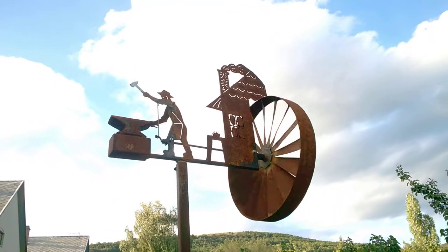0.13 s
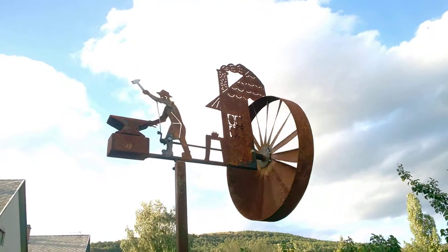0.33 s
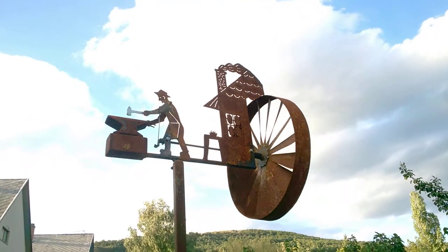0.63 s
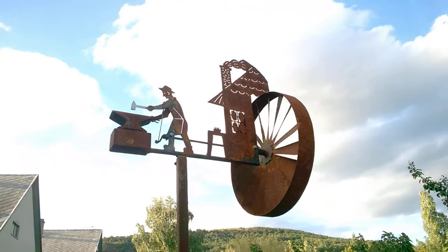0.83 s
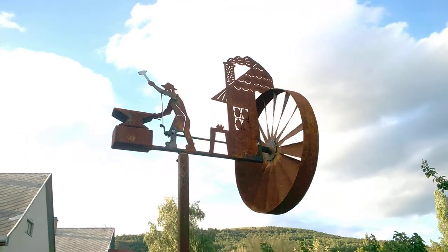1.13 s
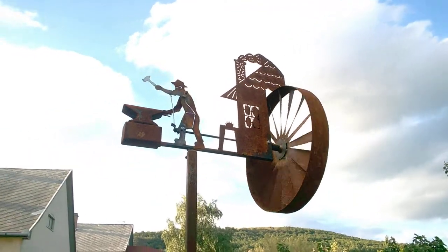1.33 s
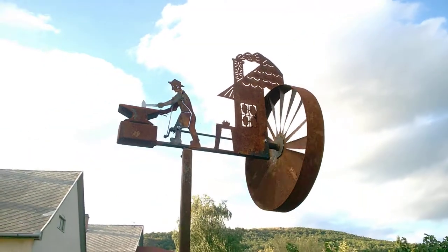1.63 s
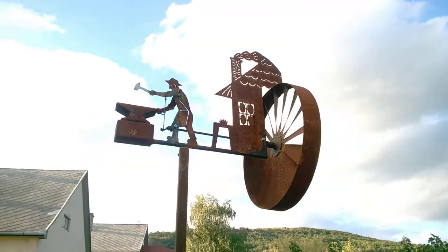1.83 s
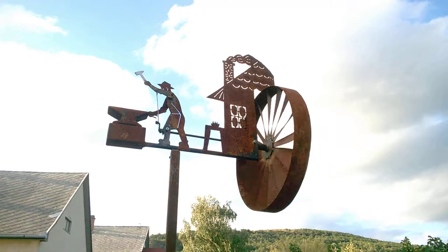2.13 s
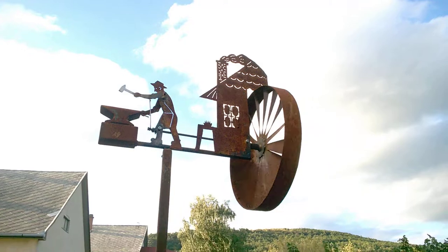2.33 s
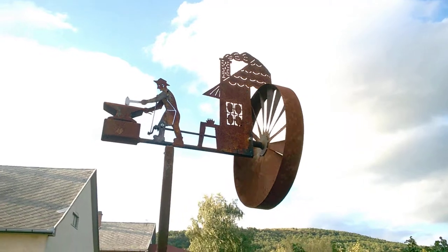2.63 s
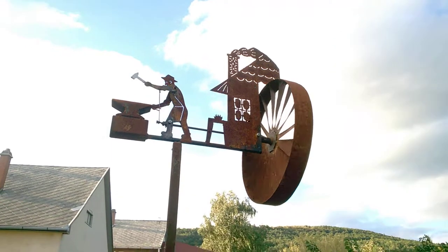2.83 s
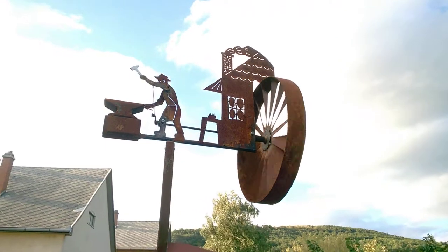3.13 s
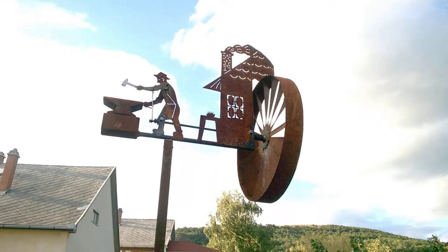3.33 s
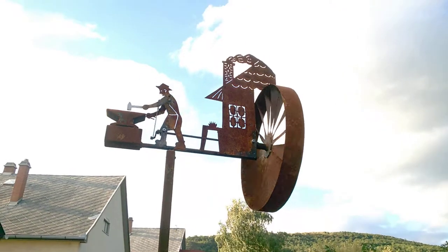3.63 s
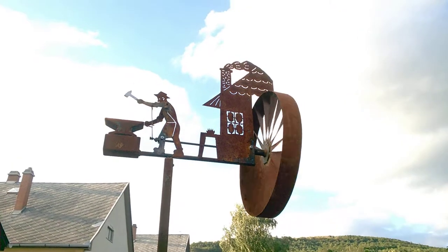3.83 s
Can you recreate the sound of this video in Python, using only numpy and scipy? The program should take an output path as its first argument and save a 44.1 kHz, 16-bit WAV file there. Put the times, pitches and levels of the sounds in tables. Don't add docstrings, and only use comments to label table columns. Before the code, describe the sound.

Wind roars and pops in bursts against a bare outdoor microphone, then calms to near quiet. A turning metal ornament squeaks thinly about once a turn, ticks once early, over a faint steady rustle of leaves.

```python
import sys
import numpy as np
from scipy import signal
from scipy.fft import rfft, irfft
from scipy.io import wavfile
from scipy.ndimage import uniform_filter1d

SR = 44100
rng = np.random.default_rng(int(sys.argv[2]) if len(sys.argv) > 2 else 0)


def undo_db(level):
    steps = np.asarray(level, float) / 20
    return 10 ** steps


def dump(signal):
    limited = np.clip(np.atleast_2d(signal).T, -1, 1)
    pcm = np.round(limited * 32767).astype(np.int16)
    wavfile.write(sys.argv[1], SR, pcm)


N = 176400

# (time [s], level [dB], eddy corner [Hz])
BREEZE = [(0, -21, 51), (.22, -19, 46), (.58, -24, 77), (0.629, -26.5, 49), (.86, -26, 44),
          (1.38, -23.5, 40), (1.45, -28, 29.4), (1.68, -30.5, 31), (1.94, -22, 49), (2.11, -29.5, 29),
          (2.26, -23.5, 21), (2.62, -24, 36.4), (2.99, -36.5, 42), (3.11, -34.5, 22), (3.42, -39, 23),
          (3.62, -37, 21), (3.78, -29.5, 12.5), (3.84, -48.5, 20)]
# (start [s], level [dB], eddy corner [Hz], length [s])
GUSTS = [(0.034, -11.5, 82.4, 0.054), (0.123, -16.5, 52.4, 0.053), (0.248, -11.5, 53, 0.063),
         (0.301, -13.5, 76.3, 0.13), (0.444, -4, 110.4, 0.046), (0.502, -11.5, 80.6, 0.06),
         (0.563, -4.5, 122.4, 0.027), (0.684, -13, 131, 0.044), (0.788, -12, 68.5, 0.09),
         (0.899, -17.5, 67, 0.022), (0.935, -19.5, 81, 0.026), (0.985, -20.5, 59, 0.053),
         (1.134, -4.5, 61, 0.014), (1.163, -15.5, 82, 0.051), (1.209, -18, 86, 0.029),
         (1.308, -16, 50.4, 0.045), (1.371, -22, 60.6, 0.038), (1.487, -13, 37.7, 0.015),
         (1.717, -15.5, 43, 0.13), (1.839, -2, 67.6, 0.016), (1.871, -5.5, 154, 0.032),
         (1.983, -20, 80, 0.084), (2.068, -22.5, 65.8, 0.057), (2.283, -15.5, 61, 0.058),
         (2.431, -17.5, 48.3, 0.056), (2.554, -30.5, 83, 0.11), (2.675, -24, 50, 0.066),
         (2.842, -11.5, 74.4, 0.034), (2.893, -22.5, 66, 0.07), (3.04, -25, 37.4, 0.051),
         (0.098, -27, 81, 0.054), (0.711, -16.5, 123, 0.046), (1.035, -17, 52, 0.041),
         (2.14, -17, 25, 0.027), (2.581, -12.5, 87, 0.01), (2.727, -26, 57.5, 0.085),
         (2.949, -17, 45, 0.042), (3.236, -40, 19, 0.12), (2.366, -26.5, 54, 0.042),
         (1.267, -21.5, 50, 0.059), (1.894, -17, 91, 0.023), (3.487, -23.5, 26.3, 0.11),
         (3.709, -29, 11, 0.067), (3.753, -33, 18, 0.046)]
# (time [s], pressure [full scale], width [s])
JOLTS = [(0.0409, -0.47, 0.0018), (0.279, -0.28, 0.0052), (0.351, 0.42, 0.003), (0.453, -0.18, 0.00075),
         (0.467, 0.45, 0.0044), (0.552, -0.4, 0.0053), (0.569, -0.29, 0.00087), (.573, 0.6, 0.002),
         (.702, -0.55, 0.0023), (0.804, -0.42, 0.0044), (1.177, 0.27, 0.0014), (1.766, 0.26, 0.0055),
         (1.842, 0.35, 0.003), (1.88, -0.21, 0.0015), (1.901, 0.3, 0.0039), (2.005, 0.22, 0.0021),
         (2.321, -0.18, 0.0034), (2.564, -0.2, 0.0025), (2.594, -0.15, 0.0018), (2.848, -0.24, 0.0036),
         (2.911, 0.13, 0.0016), (2.961, 0.17, 0.0025), (3.045, 0.07, 0.0031), (0.4457, -0.32, 0.0017),
         (.508, -0.13, 0.0017), (.54, 0.16, 0.0019), (0.5869, -0.27, 0.0023), (.6965, -0.26, 0.00088),
         (0.724, -0.15, 0.0018), (0.7349, 0.24, 0.0019), (0.8272, -0.11, 0.0011), (.9506, 0.12, 0.0017),
         (1.14, 0.18, 0.004), (1.1824, -0.11, 0.0022), (1.3233, 0.22, 0.003), (1.3688, .11, 0.0027),
         (1.4997, .12, 0.0033), (1.7463, 0.12, 0.0022), (1.8654, 0.16, 0.00095), (1.8691, 0.18, 0.0013),
         (1.874, -0.35, 0.00093), (1.399, 0.079, 0.0018), (1.218, -0.13, 0.0013), (1.889, -0.2, 0.0036),
         (1.9107, -0.18, 0.0014), (1.92, -0.19, 0.0034), (2.3015, -0.086, 0.0024), (2.439, .11, 0.0021),
         (2.4501, 0.092, 0.0029), (3.029, 0.081, 0.0045), (3.069, 0.062, 0.0042), (3.079, -0.08, 0.0044),
         (3.536, 0.031, 0.0048), (3.72, -0.021, 0.0061)]
# (start [s], length [s], level [dB], pitch [Hz], glide [Hz/s])
SQUEAKS = [(-.06, .13, -47.5, 4290, 0), (.607, .055, -60, 4200, 1803), (.645, .035, -62, 4200, -2),
           (.87, .05, -59, 4170, 0), (.665, 0.18, -58.5, 4420, -450), (.79, 0.12, -53, 4170, -4),
           (.862, 0.093, -45, 4280, -5), (1.515, .03, -58, 4250, 0), (1.595, 0.085, -53, 4355, 0),
           (1.67, 0.11, -61, 4170, 0), (1.74, 0.079, -54.5, 4160, 1), (1.763, .095, -44, 4290, 7),
           (1.89, .05, -62, 4165, 0), (2.44, .055, -64, 4220, 1500), (2.522, .03, -55, 4345, 3),
           (2.525, .028, -64, 4180, 0), (2.6, 0.06, -64.5, 4370, 0), (2.635, 0.13, -57.5, 4190, 0),
           (2.703, 0.076, -51, 4280, 0), (3.405, 0.065, -60, 4270, 600), (3.499, 0.038, -58, 4360, 0),
           (3.525, 0.037, -59, 4360, 600), (3.63, 0.15, -62, 4140, 500), (3.71, .03, -58, 4290, 0),
           (3.75, 0.074, -62, 4280, -3)]
MODES_HZ = [4178, 4290, 4351]
OCTAVES_DB = [-20, -40, -30]
# (start [s], length [s], level [dB], pitch [Hz])
SCRAPES = [
    (0.604, 0.24, -60.5, 4300),
    (1.495, 0.25, -62.5, 4190),
    (3.64, 0.13, -61, 4180),
    (2.397, 0.15, -65, 4280),
    (2.514, 0.11, -62.5, 4260),
    (3.378, 0.34, -64.5, 4210),
]
# (frequency [Hz], level [dB], T60 [s])
LINK_MODES = [(640, -9, .02), (860, -3, .018), (1080, -1, .012), (1450, -5, .012), (2200, -11, .01),
              (2900, -12, .008), (3560, -11, .03), (3750, -6, .03), (3950, 4, .007), (4350, -2, .007),
              (6100, -9, .006)]
# (frequency [Hz], density [dB per Hz])
LEAF_SPECTRUM = [(150, 1.5), (1300, -7), (1850, -3.5), (2900, -9.5), (3900, -4.5), (5800, -10),
                 (7300, -19.5), (15600, -36.5)]
# (time [s], level [dB])
RUSTLE = [
    (0.1, -57.5),
    (0.36, -58),
    (1.781, -59.5),
    (2.02, -60.5),
    (3.35, -60),
    (4.0, -63),
]


def evened(x):
    return x / np.sqrt(np.mean(x ** 2) + 1e-20)


def add(mix, time_s, sound):
    at = round(time_s * SR)
    part = mix[max(at, 0):][:len(sound) + min(at, 0)]
    part += sound[max(-at, 0):][:len(part)]


def wander(count, smooth_s):
    hz = np.fft.rfftfreq(count, 1 / SR)
    return evened(irfft(rfft(rng.standard_normal(count)) * np.exp(-(hz * smooth_s) ** 2), count))


def eddies(hz, level_db, corner_hz):
    fall_db, bend = 7.5, 0.92
    return undo_db(2 * (level_db - fall_db * (hz / corner_hz) ** bend)) / corner_hz


def wind_power(centre_hz, t):
    lump_db, lump_s = 1.3, 0.015
    lead, slack = 0.43, 0.36
    centre_hz = centre_hz[:, None]
    s, level_db, corner_hz = np.transpose(BREEZE)
    lumps_db = lump_db * wander(N, lump_s * 3)[::32]
    breeze_db = np.interp(t, s, level_db) + lumps_db
    breeze_hz = np.interp(t, s, corner_hz) * undo_db(0.5 * lumps_db)
    power = eddies(centre_hz, breeze_db, breeze_hz)
    for start_s, gust_db, gust_hz, length_s in GUSTS:
        arch = np.sin(np.pi * np.clip(((t - start_s) / length_s + lead) / (1 + lead), 0, 1))
        power += arch ** 2 * eddies(centre_hz, gust_db, gust_hz * (slack + (1 - slack) * arch ** 2))
    return power


def wind():
    even, low_cut_hz = 0.4, 23.3
    opening_push, opening_s = 0.3, 0.003
    centre_hz = np.geomspace(16, 1600, num=21)
    t, hz = np.arange(0, N, 32) / SR, np.fft.rfftfreq(N, 1 / SR)
    noise = rfft(rng.standard_normal(N))
    step = np.log(centre_hz[1] / centre_hz[0])
    out = np.zeros(N)
    for c, p in zip(centre_hz, wind_power(centre_hz, t)):
        window = np.cos(np.pi / 2 * np.clip(np.log(hz / c + 1e-9) / step, -1, 1)) ** 2
        band = irfft(noise * window, N)
        slow = np.sqrt(abs(uniform_filter1d(band ** 2, size=int(3 * SR / c))) + 1e-12)
        out += evened(band / slow ** even) * np.sqrt(c * step * np.interp(np.arange(N) / SR, t, p))
    out = signal.sosfilt(signal.butter(2, low_cut_hz, "high", fs=SR, output="sos"), out)
    u = np.arange(round(2 * opening_s * SR)) / SR / opening_s
    add(out, 0, (opening_push - out[0]) * np.cos(np.pi / 4 * u) ** 2)
    return out


def jolts(air):
    rebound, hush = 0.78, 0.75
    out, calm = np.zeros(N), np.zeros(N)
    for time_s, pressure, width_s in JOLTS:
        u = np.arange(-1500, 1500) / SR / width_s
        start_s = time_s - 1500 / SR
        add(out, start_s, pressure * (1 - rebound * u ** 2) * np.exp(-u ** 2 / 2))
        add(calm, start_s, np.exp(-u ** 2 / 8))
    return out + (1 - hush * np.tanh(2 * calm)) * air


def squeak(length_s, level_db, pitch_hz, glide_hz_per_s):
    waver_hz, flutter_db = 5, 1.8
    t = np.arange(0, length_s, 1 / SR)
    hz = pitch_hz + glide_hz_per_s * t + waver_hz * wander(8192, 0.026)[:len(t)]
    phase = 2 * np.pi * np.cumsum(hz) / SR
    mode = np.argmin(abs(pitch_hz - np.array(MODES_HZ)))
    tone = np.sin(phase) + undo_db(OCTAVES_DB[mode]) * np.sin(2 * phase)
    swell = np.sin(np.pi * (t / length_s) ** 0.8) ** 1.96
    level = undo_db(level_db + flutter_db * wander(8192, 0.016)[:len(t)])
    return swell * level * np.sqrt(2) * tone


def scrape(length_s, level_db, pitch_hz):
    width_hz, rise_hz_per_s = 150, 390
    t, hz = np.arange(0, length_s, 1 / SR), np.fft.fftfreq(16384, 1 / SR)
    spectrum = np.fft.fft(rng.standard_normal(16384)) * np.exp(-(hz / width_hz) ** 2)
    slips = np.fft.ifft(spectrum)[:len(t)].real
    fuzz = evened(slips * np.cos(2 * np.pi * (pitch_hz * t + rise_hz_per_s * t ** 2 / 2)))
    level = undo_db(level_db + 1.1 * wander(16384, 0.018)[:len(t)])
    return np.sqrt(np.sin(np.pi * t / length_s)) * level * fuzz


def tick():
    tick_s, tick_db = 0.7721, -30.5
    rebound_s, rebound_db = 0.0036, -9
    t, out = np.arange(3000) / SR, np.zeros(N)
    ring = sum(undo_db(db - 60 * t / t60_s) * np.sin(2 * np.pi * hz * t) for hz, db, t60_s in LINK_MODES)
    ring = ring * np.sin(np.pi / 2 * np.minimum(t / 0.0008, 1)) ** 2
    add(out, tick_s, undo_db(tick_db) * ring)
    add(out, tick_s + rebound_s, undo_db(tick_db + rebound_db) * ring)
    return out


def wheel():
    out = tick()
    for start_s, *settings in SQUEAKS:
        add(out, start_s, squeak(*settings))
    for start_s, *settings in SCRAPES:
        add(out, start_s, scrape(*settings))
    return out


def leaves():
    rustle_up_db, patch_db, flicker_db = 4.5, 1.02, 0.5
    thin_db_per_s, thin_hz = 0.72, 900
    frames, hz = N // 128 + 5, np.fft.rfftfreq(512, 1 / SR)
    a, b, patches = rng.standard_normal((frames, 257, 3)).T
    patches = evened(uniform_filter1d(uniform_filter1d(patches, size=6, axis=0), size=20, axis=1))
    flicker = evened(uniform_filter1d(rng.standard_normal(frames), size=8))
    f, db = np.transpose(LEAF_SPECTRUM)
    colour_db = np.interp(np.log(hz + 1), np.log(f), db) - 40 * (hz < 90)
    frame_s = np.arange(frames) * 128 / SR
    thin_db = thin_db_per_s * frame_s / (1 + (hz[:, None] / thin_hz) ** 2)
    cell_db = colour_db[:, None] - thin_db + patch_db * patches + flicker_db * flicker
    hiss = signal.istft((a + 1j * b) * undo_db(cell_db), nperseg=512, noverlap=384)[1][:N]
    s, level_db = np.transpose(RUSTLE)
    return evened(hiss) * undo_db(rustle_up_db + np.interp(np.arange(N) / SR, s, level_db))


def scene():
    return (jolts(wind()) + wheel() + leaves())[None]


def top_cut(x):
    return signal.sosfilt(signal.butter(12, 15710, fs=SR, output="sos"), x)


def record(dry):
    return top_cut(dry)


dry = scene()
out = record(dry)
dump(out)
```